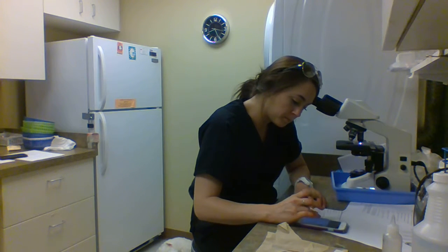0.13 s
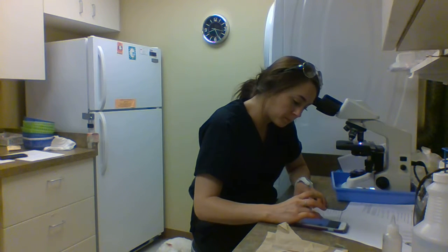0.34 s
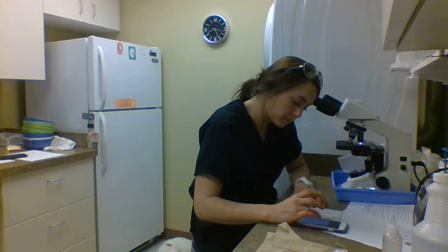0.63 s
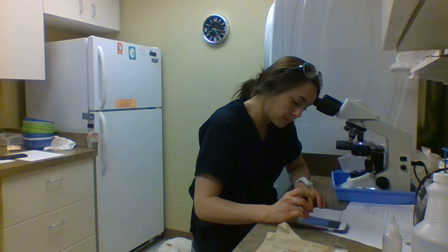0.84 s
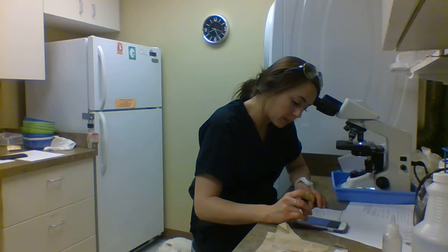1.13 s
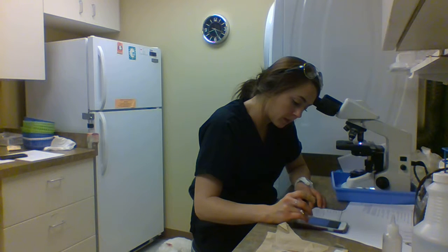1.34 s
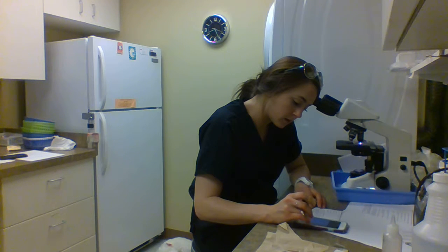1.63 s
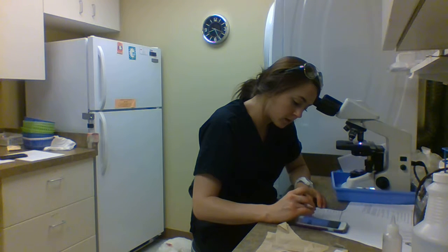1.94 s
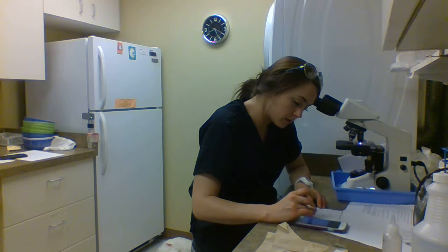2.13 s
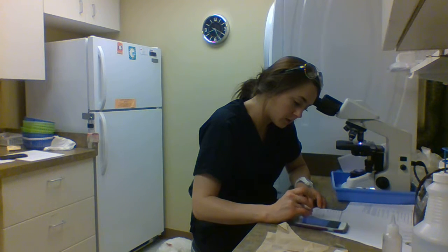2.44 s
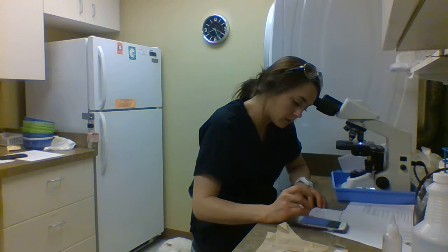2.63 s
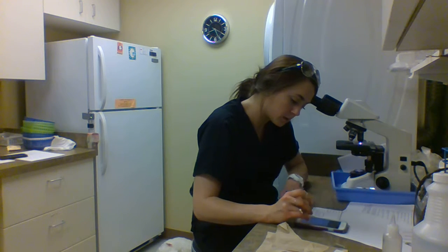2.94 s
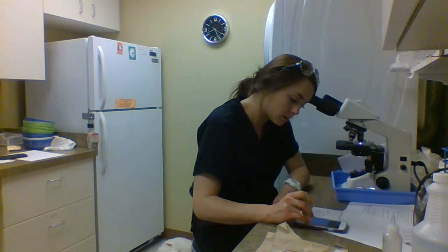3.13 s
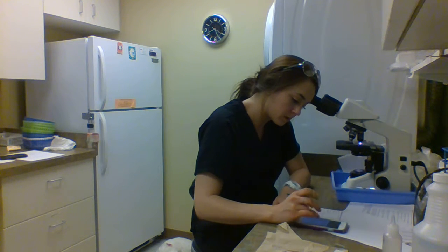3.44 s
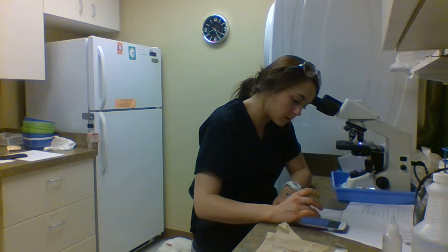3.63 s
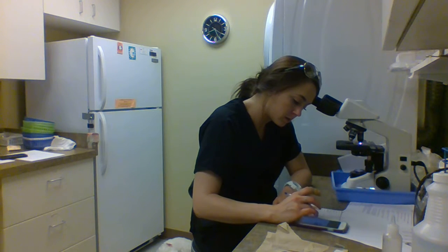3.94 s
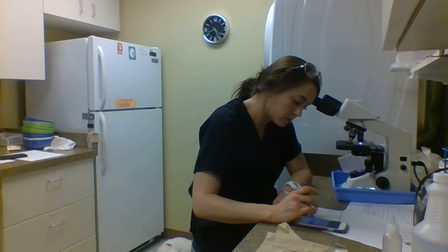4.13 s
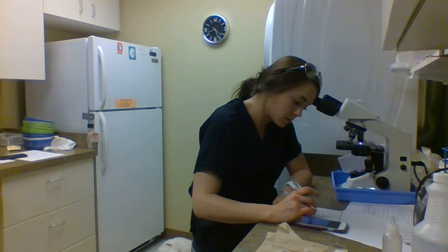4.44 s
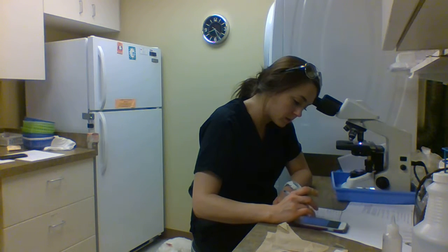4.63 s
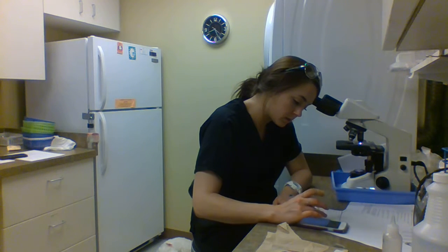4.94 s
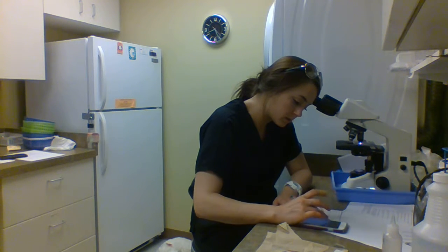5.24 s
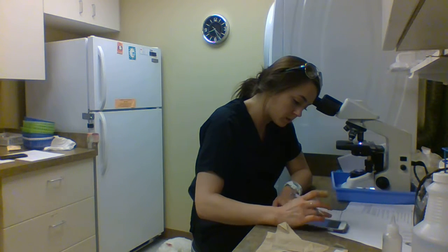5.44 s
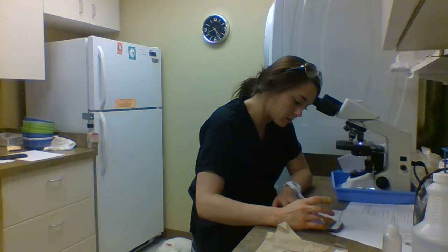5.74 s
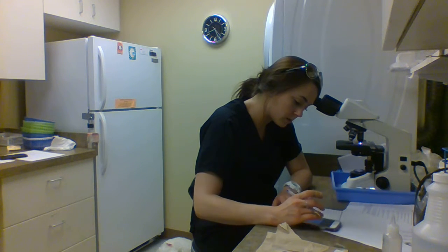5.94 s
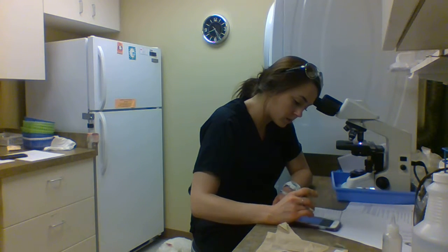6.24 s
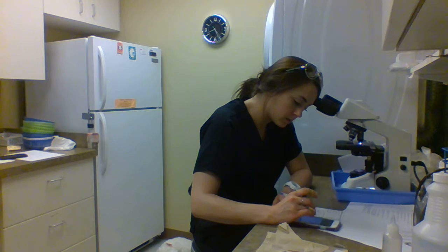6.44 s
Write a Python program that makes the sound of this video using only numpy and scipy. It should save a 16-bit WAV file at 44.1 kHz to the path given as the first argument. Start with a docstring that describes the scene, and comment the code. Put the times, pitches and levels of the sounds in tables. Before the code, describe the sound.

In a lab room with a faint, patchy hum, hands move on a hollow counter that the microphone is resting on. A few gentle taps lead into three booming knocks and then a louder quick pair, with the hum and hiss swelling slightly around them. Afterwards come scattered low fingertip thumps, soft paper and sleeve rustles and a small cluster of ticks, before the handling thins out.

```python
"""Hands on a hollow laboratory counter

Five hard knocks make the counter boom under the microphone resting on it, and the room answers.
Soft fingertip taps make short low thumps. Paper and a sleeve rustle, and something small ticks.
A dull, patchy room hum lies underneath, rising when loud handling opens a noise suppressor."""
import sys
import numpy as np
from scipy import signal
from scipy.fft import rfft, irfft, next_fast_len
from scipy.io import wavfile
from scipy.ndimage import uniform_filter1d

SR = 44100
rng = np.random.default_rng(int(sys.argv[2]) if len(sys.argv) > 2 else 0)


def dump_mix(stems):
    """Bounce the given channels to the path in sys.argv[1] as a 16-bit WAV at rate SR."""
    frames = np.atleast_2d(stems).T  # one column per channel
    limited = np.clip(frames, -1, 1)  # hard clip at full scale
    pcm = np.round(limited * 32767).astype(np.int16)
    wavfile.write(sys.argv[1], SR, pcm)


N = 290167


def knocks():
    """Each blow cracks, swells the counter's notes while the hand presses, and rings until damped."""
    # hard blows: t/s, level/dB, boom/dB, upper notes/dB, crack/dB, brightness/dB, room/dB, damping/dB
    blows = [(1.625, -6, 1.5, -1, -17, -14, -25, -9), (2.244, -5.5, 3, 3.5, -13.5, -21.5, -25, -11),
             (2.492, -4.5, 5, -3.5, -19, 5, -29, -10.5), (3.172, 3.5, -3, -8, -23, 9.5, -33, -26),
             (3.362, -3, 8, -0.5, -15, -0.5, -27.5, -3.5)]
    # the notes the counter rings at: f/Hz, level/dB, swell/s, drop after it/dB, time to fade 60 dB/s
    notes = [(95.8, -27, 0.081, -2.5, 0.075), (147.2, -10, 0.032, -7, 0.34), (203.7, 1, 0.028, -14, 0.32),
             (249.5, -14.5, 0.018, -0.5, 0.22), (314.3, -17.5, 0.0088, -7, 0.61),
             (459.6, -10.5, 0.031, -17, 0.4), (532.5, -17, .01, -3, 0.13), (718, -22.5, 0.0081, 0.5, 0.13),
             (797, -17.5, 0.0031, -6.5, 0.13), (923.6, -20, 0.016, -10.5, 0.14),
             (1072, -33.5, .006, 3.5, 0.16), (1293, -18, 0.0065, -9.5, 0.11),
             (1671, -29, 0.0081, -16.5, 0.027), (2042, -37.5, 0.011, -6.5, 0.15),
             (2454, -45, 0.013, -16, 0.065), (3020, -35.5, 0.0031, -12.5, 0.089)]
    # tone colour of the crack: f/Hz, level/dB
    crack_colour = [(290, -20), (500, 6), (632, -28.5), (874, -20.5), (1020, -15.5), (1690, -12.5),
                    (2140, -27.5), (4470, -31.5), (7230, -57), (9400, -85.5), (15900, -120)]
    # how the crack dies away: f/Hz, time to fade 60 dB/s
    crack_decay = [(600, 0.25), (1500, 0.12), (3000, 0.093), (6000, 0.019)]
    out, t = np.zeros(N), np.arange(SR) / SR
    for start, db, boom_db, upper_db, crack_db, bright_db, room_db, damping_db in blows:
        ring = np.zeros(len(t))
        for k, (hz, level_db, swell, drop_db, fade_s) in enumerate(notes):
            grow = (1 - np.exp(-(t / (0.28 * swell)) ** 2)) * amp(8 * np.minimum(t / swell - 1, 0))
            fade = amp(drop_db * step(t, swell, 0.00069) - 60 * np.maximum(t - swell, 0) / fade_s)
            # where the blow lands sets how strongly the lowest and the upper notes ring
            spot_db = boom_db if hz < 170 else upper_db * (hz > 230) + rng.normal(0, 2)
            waver = drift(t, 0.006 + 0.02 * hz / 1000)  # from things rattling on the top
            tone = np.sin(2 * np.pi * hz * t + waver)
            ring += (-1) ** k * amp(level_db + spot_db) * grow * fade * tone
        crack = dying_noise(crack_colour, crack_decay, 5.2, t) * (1 - np.exp(-(t / 0.0027) ** 2))
        # a harder edge is brighter
        crack = filtered(crack, lambda f: amp(bright_db / (1 + (3800 / (f + 1)) ** 4)))
        hand_damping = amp(damping_db * step(t, at=0.09, width=0.0015))
        direct = hand_damping * (ring + amp(crack_db) * crack)
        add(out, start, amp(db) * (direct + amp(room_db) * room_answer(t)))
    return out


def room_answer(t):
    """The blurred echo of one blow builds up as the walls answer, then dies away."""
    # tone colour of the room: f/Hz, level/dB
    colour = [(150, -38), (250, -2), (320, -2), (440, -4.5), (620, -8.5), (1320, -17), (1600, -23),
              (2800, -29), (4300, -37), (5900, -33), (6900, -35.5), (7700, -37), (9000, -120)]
    # how long the room rings: f/Hz, time to fade 60 dB/s
    decay = [(300, 0.39), (1000, 0.83), (2500, 0.52), (4200, 0.69), (6000, 0.7)]
    return dying_noise(colour, decay, 7, t) * (1 - np.exp(-t / 0.055))


def taps():
    """A soft fingertip makes a short low thump, mostly near 145 Hz, that drops away as it lifts."""
    # fingertip touches: t/s, level/dB, f/Hz, length/s
    touches = [(0.328, -33, 150.4, 0.062), (0.835, -30.5, 124, 0.05), (0.884, -33.5, 154, 0.05),
               (1.152, -30, 143, 0.033), (1.589, -39.5, 154, 0.068), (1.714, -24, 174, 0.031),
               (1.732, -15.5, 140, 0.028), (1.79, -34.5, 155, 0.021), (1.947, -37.5, 161, 0.028),
               (2.061, -33.5, 150, 0.029), (2.179, -37.5, 167, 0.074), (2.21, -27, 224, 0.048),
               (2.46, -18.5, 143, 0.02), (2.6, -26, 141, 0.033), (2.743, -37, 230, 0.023),
               (3.01, -26.5, 131, 0.03), (3.129, -39, 142, 0.069), (3.282, -23, 151, 0.036),
               (3.328, -27.5, 129.6, 0.058), (3.504, -13.5, 138, 0.02), (3.571, -21.5, 131, 0.034),
               (3.846, -25, 142, 0.035), (3.893, -30, 135, 0.019), (4.067, -41, 149, 0.031),
               (4.355, -28, 143, 0.03), (4.649, -24, 144, 0.041), (4.926, -25, 144, 0.042),
               (5.015, -12.5, 141.4, 0.075), (5.359, -26.5, 123, 0.021), (5.444, -31.5, 210, 0.025),
               (6.303, -39, 143, 0.031), (6.54, -29, 138, 0.045)]
    brushes = [(start, db, 154, length) for start, db, length in scatter(8, db=-48, length_s=0.04)]
    out, t = np.zeros(N), np.arange(SR // 5) / SR
    for start, db, hz, length in touches + brushes:
        press = step(t, 0.014, 0.0055) * amp(-60 * t / 0.4) * (1 - 0.93 * step(t, length, 0.003))
        release = amp(-60 * np.maximum(t - length, 0) / 0.14)
        waver = drift(t, 0.013) + rng.uniform(0, 2 * np.pi)
        add(out, start - 0.01, amp(db) * press * release * np.sin(2 * np.pi * hz * t + waver))
    return out


def scuffs_and_rustles():
    """Short noisy bursts stir the counter: the scuff of knocks landing, and paper and sleeve rustles."""
    # noisy bursts: t/s, level/dB, brightness/dB, middle resonance/dB, length/s
    bursts = [(0.844, -45, -5, -10, 0.051), (1.206, -47, 1.5, 3, 0.042), (1.621, -20, -3.5, -14, 0.022),
              (1.757, -39.5, 3, 0, 0.021), (1.777, -46.5, -1, 11, 0.03), (1.866, -53.5, 1.5, 8.5, 0.02),
              (2.21, -34, -7.5, -7.5, 0.079), (2.245, -29.5, -1, -8.5, 0.046), (2.437, -39.5, -7, 2, 0.055),
              (2.552, -31, -14, 1, 0.026), (2.631, -40, -8, 8, 0.034), (2.675, -46, -9, 6, 0.023),
              (2.849, -51.5, 4.5, 7, 0.014), (2.935, -46.5, 6, -5, 0.028), (3.168, -21.5, -0.5, -8, 0.043),
              (3.209, -23, 1, -4, 0.053), (3.28, -36.5, -4.5, 2, 0.028), (3.436, -32, -12, 0, 0.04),
              (3.602, -37.5, -2.5, 0.5, 0.021), (3.637, -48.5, 3, 5, 0.025), (3.662, -45.5, -0.5, 5, 0.018),
              (3.881, -47, -2, 0.5, 0.037), (3.918, -47, -1.5, -4, 0.054), (4.351, -48, 3.5, -2.5, 0.071),
              (4.413, -49, 1, -8.5, 0.03), (4.477, -56.5, 4, 11, 0.035), (4.653, -44.5, -2.5, -1.5, 0.057),
              (4.7, -50.5, 2, -1, 0.029), (4.737, -56.5, 1.5, 10.5, 0.039), (4.922, -45.5, 4, 5, 0.059),
              (4.96, -42.5, -3.5, 0.5, 0.06), (5.017, -40.5, -2, -10.5, 0.067),
              (5.066, -38.5, -3.5, -3.5, 0.085), (5.193, -46.5, 13, 1.5, 0.041), (5.225, -45, 9, -9, 0.069),
              (5.429, -38.5, -4.5, -2, 0.023), (5.442, -42.5, -10, -3.5, 0.058),
              (5.53, -52.5, 3, -2.5, 0.043), (5.754, -42.5, -3, -0.5, 0.048),
              (5.813, -51.5, -0.5, 1, 0.043), (5.896, -54.5, 2.5, 1, 0.045), (6.255, -50, 2, -2, 0.039)]
    # the treble of a burst: f/Hz, level/dB
    treble = [(1200, -29), (1800, 0), (3000, -6.5), (4500, -12), (6000, -11.5), (7300, -16.5), (9000, -120)]
    # a burst's middle, low, upper and treble parts: level/dB, share of the brightness
    parts = [(-2.5, 0.1), (-10.5, -1.3), (-8.5, 0.7), (-20.5, 0.4)]
    middle = resonances([(680, 124, -1.5), (810.7, 79, 2)])
    low = resonances([(300, 57, 3), (480, 200, -14)])
    upper = resonances([(1020, 120, -4.5), (1327, 140, 2.5)])
    noises = [noise(colour, patchy_db=3.5) for colour in (middle, low, upper, tone_curve(treble))]
    fidgets = [(start, db, 0, 0, length) for start, db, length in scatter(3, db=-59, length_s=0.045)]
    levels, t = np.zeros((4, N)), np.arange(SR // 4) / SR
    for start, db, bright_db, ring_db, length in bursts + fidgets:
        rise = 1 - np.exp(-t / (0.1 * length))
        fade = amp(-11 * t / length) * (1 - step(t, length, 0.0078))
        for level, (part_db, share), extra_db in zip(levels, parts, (ring_db, 0, 0, 0)):
            add(level, start, amp(db + part_db + extra_db + share * bright_db) * rise * fade)
    return np.sum(levels * noises, axis=0)


def ticks():
    """Something small and hard rings roughly for a moment."""
    # bright ticks: t/s, level/dB
    hits = [(3.569, -49), (3.8534, -56), (4.9337, -52.5), (4.946, -44), (4.9812, -44), (5.004, -49.5),
            (5.055, -41.5)]
    # the small object's notes: f/Hz, level/dB, time to fade 60 dB/s
    notes = [(4140, -1, 0.039), (4420, -3, 0.01)]
    out, t = np.zeros(N), np.arange(SR // 10) / SR
    rise = 1 - np.exp(-(t / 0.0016) ** 2)
    for start, db in hits:
        for hz, level_db, fade_s in notes:
            tone = np.sin(2 * np.pi * hz * t + drift(t, 0.1))
            add(out, start - 0.002, amp(db + level_db - 60 * t / fade_s) * rise * tone)
    return out


def room_hum(opened):
    """Fuzzy low notes on dull noise, with flickering hiss above; all rise as the suppressor opens."""
    # the hum's slow rise and fall: t/s, level/dB
    loudness = [(0.0, -53), (0.49, -59.5), (1.6, -57), (2.901, -57.5), (4.03, -58), (5.55, -58),
                (6.58, -55)]
    # the hum's resonances: f/Hz, width/Hz, level/dB
    hum_notes = [(143, 30, 2.5), (316.6, 13, 0.5), (476, 32, -4), (796, 58, -3.5), (1087, 88, -11),
                 (1354, 46, -8.5)]
    # the dull noise under them: f/Hz, level/dB
    bed_colour = [(24, -81), (40, -43), (146, 1.5), (211, -29), (303, -14), (393, -15.5), (475, -15),
                  (784, -10.5), (2500, -28.5), (3250, -46), (5500, -120)]
    # tone colour of the hiss: f/Hz, level/dB
    hiss_colour = [(1060, -35), (1800, 2), (1990, -13.5), (3060, -3), (3300, -6.5), (3530, -6), (5830, -6),
                   (7230, -6), (9400, -44), (15900, -120)]
    # thin wavering tones in the hiss: f/Hz, width/Hz, level before squaring/dB
    whine_notes = [(3250, 30, 0), (5830, 44, 3)]
    drone = amp(-1.5) * noise(resonances(hum_notes), patchy_db=9.5, ceiling=1.6)
    bed = amp(-3.5) * noise(tone_curve(bed_colour), patchy_db=7)
    hiss = noise(tone_curve(hiss_colour), patchy_db=5.6, ceiling=4.8)
    whine = amp(-18) * noise(lambda f: resonances(whine_notes)(f) ** 2, patchy_db=6, ceiling=1.6)
    hum_db = np.interp(np.arange(N) / SR, *np.transpose(loudness)) + 8.5 * opened
    hiss_db = -73 + 12 * opened
    return amp(hum_db) * (drone + bed) + amp(hiss_db) * (hiss + whine)


def suppressor(sound):
    """How far the noise suppressor is open (0 to 1): it follows the loudness with a lag."""
    level_db = 10 * np.log10(lag(sound ** 2, seconds=0.031) + 1e-12)
    half_open_db, softness_db = -27.5, 12
    return lag(step(level_db, half_open_db, softness_db), seconds=0.16)


def amp(db):
    """Turns decibels into a factor to multiply by."""
    return 10 ** (np.asarray(db) / 20)


def unit(x):
    """Scales a signal to an average power of 1."""
    return x / np.sqrt(np.mean(x ** 2) + 1e-20)


def step(x, at, width):
    """A soft step from 0 to 1."""
    return 0.5 + 0.5 * np.tanh((x - at) / width)


def lag(x, seconds):
    """Follows x smoothly and a little late."""
    hold = np.exp(-1 / (seconds * SR))
    return signal.lfilter([1 - hold], [1, -hold], x)


def add(track, start, sound):
    """Mixes a sound into the track at a time in seconds."""
    part = track[max(round(start * SR), 0):][:len(sound)]
    part += sound[:len(part)]


def along(points, hz):
    """Reads between (f/Hz, value) points, giving each octave equal room."""
    f, values = np.transpose(points)
    return np.interp(np.log(hz + 1), np.log(f + 1), values)


def tone_curve(points):
    """A filter curve through (f/Hz, level/dB) points."""
    return lambda f: amp(along(points, f))


def resonances(rows):
    """The filter curve of a body that rings at (f/Hz, width/Hz, level/dB) rows."""
    def response(f):
        ringing = sum((-1) ** k * amp(db) * 1j * f * width / (hz * hz - f * f + 1j * f * width)
                      for k, (hz, width, db) in enumerate(rows))
        return ringing / (1 + (f / (1.5 * rows[-1][0])) ** 5)  # little passes above the last one
    return response


def filtered(x, response):
    """Turns each frequency in x up or down by a filter curve."""
    size = next_fast_len(len(x) + 8192)
    return irfft(rfft(x, size) * response(np.fft.rfftfreq(size, 1 / SR)), size)[:len(x)]


def noise(response, patchy_db, size=N, ceiling=0.95):
    """Filtered noise whose level varies in random patches of time and pitch."""
    spectrum = signal.stft(rng.standard_normal(size + 1024), nperseg=512)[2]
    patches = uniform_filter1d(rng.standard_normal(spectrum.shape), size=2, axis=0)
    patches = unit(uniform_filter1d(patches, size=4, axis=1))
    gain = amp(patchy_db * np.minimum(patches, ceiling))  # holes go deep, loud patches are capped
    patchy = signal.istft(spectrum * gain, nperseg=512)[1][:size]
    return unit(filtered(patchy, response))


def dying_noise(colour, decay, patchy_db, t):
    """A burst of noise in which each pitch dies at its own speed."""
    burst = noise(tone_curve(colour), patchy_db, size=len(t), ceiling=1.4)
    hz, times, spectrum = signal.stft(burst, SR, nperseg=256)
    fade = amp(-60 * times / along(decay, hz)[:, None])
    return signal.istft(spectrum * fade, SR, nperseg=256)[1][:len(t)]


def drift(t, step_rad):
    """A smoothly wandering phase that makes a tone waver."""
    walk = step_rad * np.cumsum(rng.standard_normal(len(t)))
    return uniform_filter1d(uniform_filter1d(walk, size=90), size=90)


def scatter(count, db, length_s):
    """Events at random moments, each varied a little: t/s, level/dB, length/s."""
    starts = rng.uniform(size=count) * N / SR
    return [(start, db + 3.4 * louder, length_s * (1 + 0.21 * longer))
            for start, (louder, longer) in zip(starts, rng.standard_normal((count, 2)))]


def scene():
    """All sources at one microphone; loud handling lets more of the background through."""
    hands = knocks() + taps() + scuffs_and_rustles() + ticks()
    return (hands + room_hum(suppressor(hands)))[None]


def record(dry):
    """The microphone loses the deep bass, rounds the tallest peaks and cuts the high treble."""
    bass_hz, treble_hz, top_hz = 90, 7200, 7600
    thinned = filtered(dry[0], lambda f: (1j * f / (bass_hz + 1j * f)) ** 2)
    rounded = thinned / (1 + np.abs(thinned / 0.97) ** 6) ** (1 / 6)
    return filtered(rounded, lambda f: (f < top_hz) / (1 + (f / treble_hz) ** 30))[None]


dry = scene()
out = record(dry)
dump_mix(out)
```